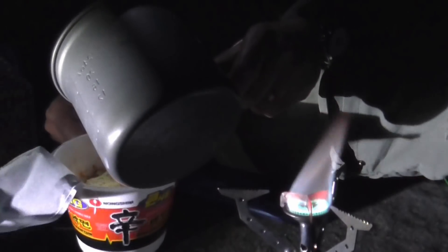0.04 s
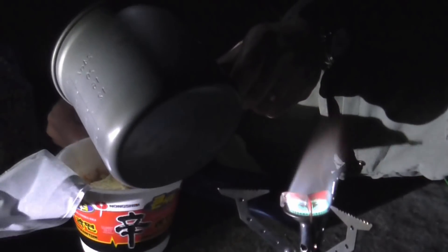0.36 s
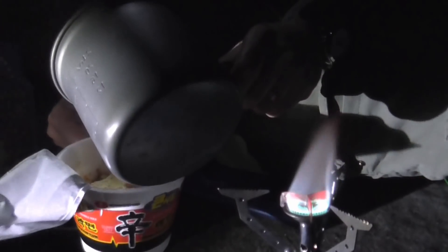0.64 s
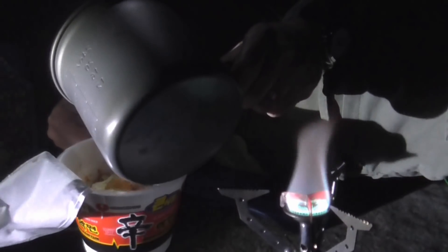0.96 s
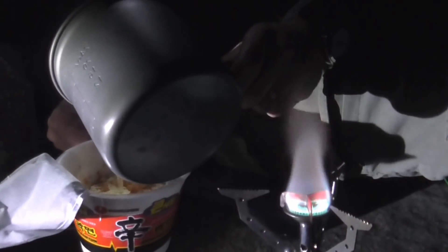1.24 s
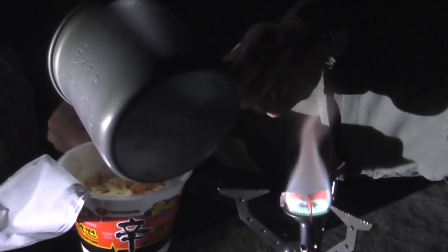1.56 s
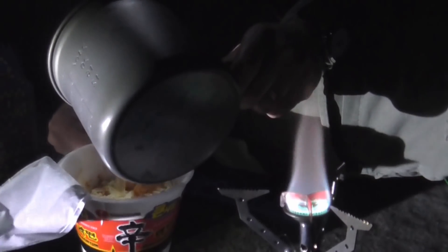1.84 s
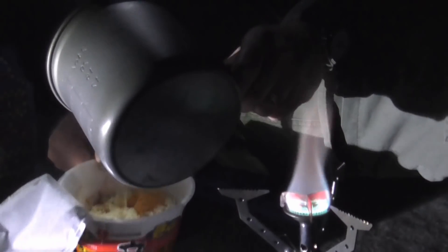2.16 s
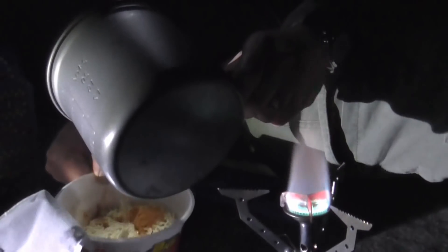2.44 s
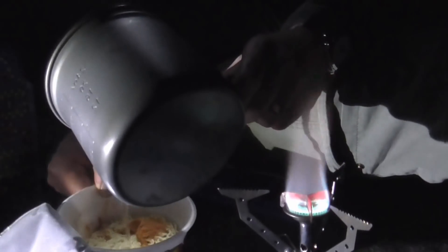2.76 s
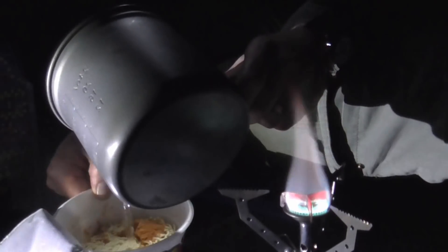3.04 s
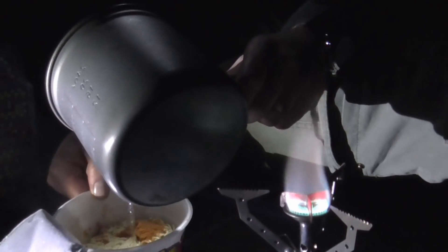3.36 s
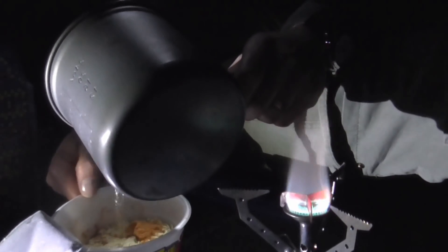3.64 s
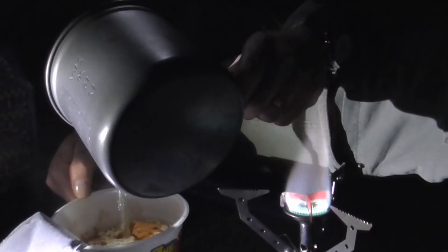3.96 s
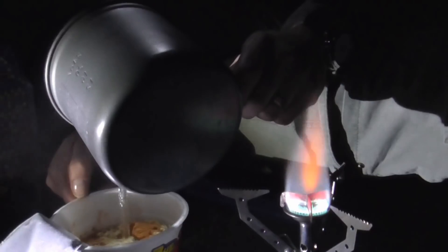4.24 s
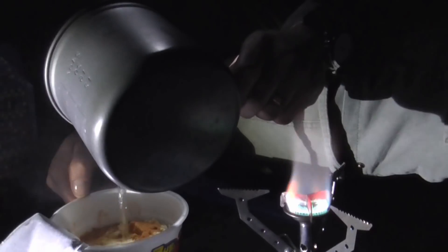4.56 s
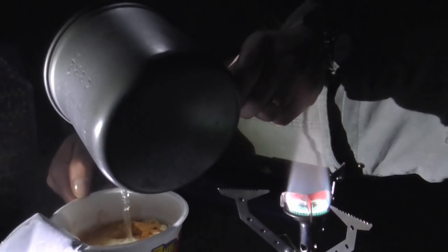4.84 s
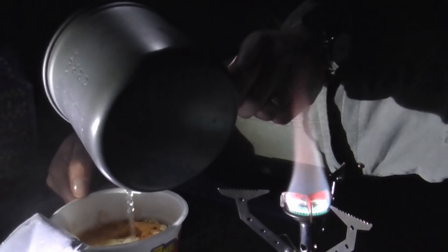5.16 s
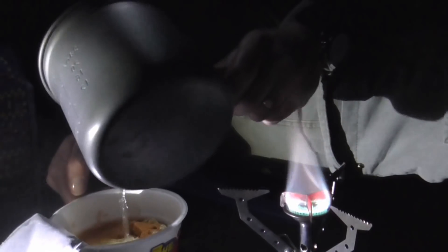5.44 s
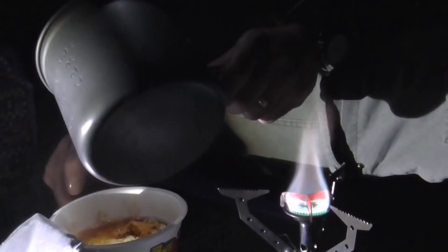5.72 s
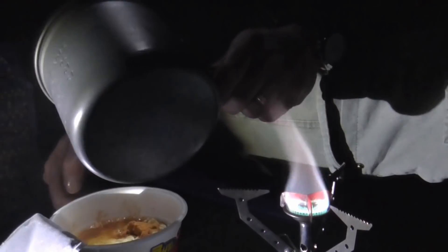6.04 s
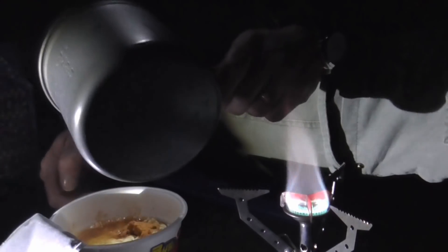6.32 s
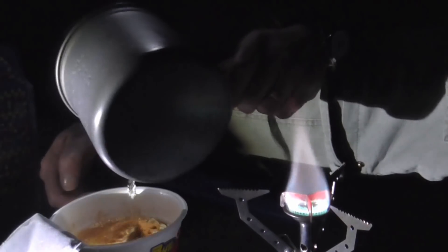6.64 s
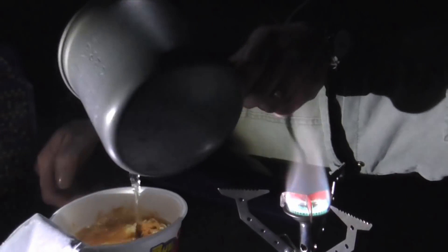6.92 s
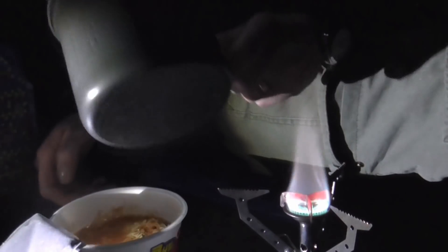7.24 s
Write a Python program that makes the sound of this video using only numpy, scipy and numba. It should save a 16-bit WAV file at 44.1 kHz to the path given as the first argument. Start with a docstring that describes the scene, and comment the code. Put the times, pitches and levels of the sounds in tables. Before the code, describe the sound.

Outdoors, close stereo microphones pick up the constant low roar and hiss of a gas burner, with no reverberation. Beneath it, water briefly trickles onto dry noodles. The noodle cup gives one sharp snap, then light knocks and rubs mix with a rustling sleeve. A thin stream patters into the cup for about three seconds, slowly growing, followed by small bubble pops and two short dribbles.

```python
"""Outdoors at night, two microphones close to a gas camping stove, with no room around it. The flame roars
low and steady and its jet hisses throughout. A sleeve rustles, hot water trickles from a metal mug into a
cup of dry noodles, and the cup's rim snaps once in the hand. Then comes the long pour: the thin stream
patters and spits while the cup knocks and rubs. Small bubbles burst more often as broth pools, and two
last dribbles follow near 7 s."""
import sys
import numpy as np
from scipy import signal
from scipy.fft import rfft, irfft
from scipy.io import wavfile
from scipy.ndimage import uniform_filter1d
from numba import njit

SR = 44100
rng = np.random.default_rng(int(sys.argv[2]) if len(sys.argv) > 2 else 0)


def master_out(mix):
    """Clip the mix to full scale and print it as 16-bit PCM to the path in sys.argv[1]."""
    frames = np.transpose(np.atleast_2d(mix))
    ceiling = np.clip(frames, -1, 1)
    pcm = np.round(ceiling * 32767).astype(np.int16)
    wavfile.write(sys.argv[1], SR, pcm)


N = 330000
TIME = np.arange(N) / SR
SHORT = TIME[:2048]  # time axis of one brief event
SHIFT_ATTACK_S, SHIFT_RELEASE_S = 0.011, 0.017

# modes of the cup's wall (frequency [Hz], level [dB], free decay t60 [s])
WALL = [(775, 3.5, 0.017), (1020, 0, 0.012), (1300, -5, 0.023), (1470, -2, 0.015), (1770, 3.5, 0.0069),
        (2080, -28, 0.0098)]


def stove(pan_db=-0.47):
    """The flame is a broad source a little to the right: part of its sound differs between the sides."""
    # stereo width of the stove (frequency [Hz], side minus mid [dB])
    width = [(30, 6), (60, -15), (110, -20.5), (250, -25), (420, -20.5), (700, -11), (2400, -7.5),
             (4400, -8), (6400, -42), (9000, -6.5), (15000, -3.5)]
    mid, side = burner(), colour(burner(), width)
    return stereo(mid, side, pan_db)


def burner(roar_db=-37.5, rush_db=-54.5, flutter_db=1.2):
    """The turbulent flame roars, gas flutters through the burner head and the jet hisses."""
    # spectrum of the flame (frequency [Hz], level [dB])
    roar_colour = [(25, -55), (50, -39), (62, -25.5), (100, -14.5), (140, -8.5), (230, -5), (310, 0.5),
                   (420, -2.5), (480, -6.5), (550, -15), (690, -16.5), (800, -35.5), (1100, -48),
                   (1800, -110)]
    # spectrum of the gas in the burner head (frequency [Hz], level [dB])
    rush_colour = [(450, -23), (750, -0.5), (1050, 3), (1350, 0.5), (1550, -6.5), (1900, -5), (2300, -16.5),
                   (2700, -20.5), (4000, -39)]
    roar = unit(colour(noise(), roar_colour)) * undb(roar_db + 0.31 * walk(7.3))
    rush = unit(colour(noise(), rush_colour)) * undb(rush_db + 0.56 * walk(9) + flutter_db * walk(120))
    return roar + rush + jet()


def jet():
    """The gas jet hisses broadly; the mug moving beside the burner retunes its resonances."""
    # spectrum of the broad hiss (frequency [Hz], level [dB])
    hiss_colour = [(1800, -10), (2750, -9), (3300, -1.5), (4000, 0), (4800, -0.5), (5300, 3), (7200, 2.5),
                   (9200, 0), (10400, -2.5), (12000, -5.5), (13800, -4), (15600, -6.5), (17000, -31)]
    # resonances of the hiss (base frequency [Hz], width [Hz], base gain [dB], following of the mug [0-1])
    modes = [(5350, 410, 5, 0.06), (5895, 430, 8, 0.05), (6290, 520, 10.5, 0.92), (8470, 760, 6.5, 0.77),
             (11220, 760, 2.5, 0)]
    # the hiss as the mug moves (time [s], level [dB], frequency ratio [1], resonance boost [dB])
    mug_path = [(0, -54, 0.99, 0.5), (1.5, -56, 0.979, 0), (2.5, -53.5, 1.02, -3), (3.2, -55, 1.07, -5),
                (4.6, -55, 1.035, -3.5), (5.55, -53.5, 1.01, -3), (5.95, -55.5, .94, -7),
                (6.6, -55.3, .96, -7), (7.1, -55, .985, 0.5)]
    hiss_db, ratio, boost_db = curves(mug_path)
    hiss, drive = colour(noise(), hiss_colour), colour(noise(), hiss_colour)
    for hz, width, db, follows in modes:
        hiss = hiss + undb(db + follows * boost_db) * ring(drive, hz * ratio ** follows, width)
    return unit(hiss) * undb(hiss_db + 0.28 * walk(10))


def stream(drops_per_s=300, spread_db=3.8, fizz_share=.4, fizz_db=-4, gain_db=1.5):
    """The stream breaks into drops that slap the noodles and trap tiny bubbles."""
    # spectrum of drops inside the cup (frequency [Hz], level [dB])
    drop_colour = [(500, -31), (1100, 4), (1600, 3.5), (2100, 9), (2700, -9), (3400, 4), (4300, -3.5),
                   (5200, 8), (6000, 6.5), (7200, 5.5), (9500, 3.5), (12000, -6.5), (15600, -20.5)]
    slaps, fizz, splash = np.zeros(N), np.zeros(N), noise()
    for when, size, pitch, kind in rng.random((int(drops_per_s * N / SR), 4)):
        s = when * N / SR
        gain = undb(spread_db * min(-np.log(1 - size), 3.2))  # many small drops, few large
        if kind < fizz_share:
            hz = 4200 * 2 ** (1.6 * pitch)
            add(fizz, s, gain * bubble(hz, t60_at_5khz=0.0036, glide=0.062))
        else:
            add(slaps, s, gain * fade(0.012) * (1 - fade(0.004)))
    water = unit(colour(slaps * splash, drop_colour)) + undb(fizz_db) * unit(fizz)
    return place(water * flow() * undb(gain_db), pan_db=1.5, side_db=-23.0)


def flow(attack_s=.026, release_s=.07, fill_db_per_s=1.64, soak_db=-73.5):
    """Strength of the patter: each pour starts quickly, swells as water pools and drips out."""
    # a trickle, the long pour, two dribbles (start [s], length [s], relative starting level [dB])
    pours = [(1.15, 0.64, -66.5), (2.33, 3.3, -63.5), (6.775, .17, -55.5), (7.107, .11, -59)]
    patter = np.zeros(N)
    for s, length, db in pours:
        swell_db = fill_db_per_s * np.clip(TIME - s, 0, length)
        patter += gesture(s, length, attack_s, release_s) * undb(db + swell_db)
    return np.hypot(patter, undb(soak_db))  # the noodles crackle faintly between pours


def ticks(t60=0.011, swell_t60=.009, gain_db=23, pivot_hz=6500):
    """Spitting water and the crackling cup give brief cracks; the sharper the contact, the brighter."""
    # single ticks (time [s], relative level [dB], brightness [dB per octave])
    events = [(0.2197, -41.5, -1), (2.7495, -47, 4), (2.828, -43.5, 8), (2.836, -43.5, 5),
              (3.141, -43.5, 8.5), (3.2098, -47.5, -3), (3.544, -44, -2), (3.717, -47.5, -4),
              (3.9247, -45, 6), (3.942, -44, 7), (3.9856, -43, 6), (4.0016, -46, -7), (4.0302, -40, -3.5),
              (4.043, -42.5, -4), (4.3037, -39.5, 5), (4.3985, -49, 6), (4.5558, -47.5, 1),
              (5.099, -41.5, -2.5), (5.1165, -40.5, -0.5), (5.131, -42, -1), (5.274, -41, -1.5),
              (5.5837, -48, 0), (5.605, -37.5, 0), (6.6018, -44.5, 1.5), (6.8622, -48.5, -4),
              (6.8973, -43, 0.5), (7.0196, -46.5, 6), (7.129, -44, 1.5)]
    # spectrum shared by all ticks (frequency [Hz], level [dB])
    tick_colour = [(400, -3), (1770, 2.5), (3320, 0), (6430, 6.5), (11900, -1), (17000, -8)]
    hz, base_db = np.transpose(tick_colour)
    octaves = np.log2(np.maximum(hz, hz[1]) / pivot_hz)  # the tilt levels off in the lows
    track = np.zeros(N)
    for s, db, brightness in events:
        tilted = np.column_stack([hz, base_db + brightness * octaves])
        add(track, s, undb(db + gain_db) * colour(crack(t60, swell_t60), tilted))
    return place(in_cup(track), pan_db=1.5, side_db=-13.5)


def in_cup(x):
    """The cup adds its short ring to a sound without changing its power."""
    # resonances of the cup (frequency [Hz], width [Hz], gain [dB])
    modes = [(2120, 610, -0.5), (3420, 1100, -1.5), (5150, 740, -3.5), (7030, 1400, -4.5)]
    ringing = sum(undb(db) * ring(x, hz, width) for hz, width, db in modes)
    return unit(x + ringing) * np.std(x)


def snap(at_s=1.9342, peak_db=-15.8, contact_t60=.006, crack_db=-18):
    """As the hand lowers the cup, its rim gives way in quick slips that ring heavily damped modes."""
    # modes of the rim (frequency [Hz], half width [Hz], level [dB])
    rim = [(1700, 190, 2), (1954, 100, -5), (3650, 700, -1.5), (5580, 380, 0.5), (6780, 420, 2),
           (7820, 370, 0), (8750, 350, -6), (9900, 540, -2.5), (11000, 500, -9), (14470, 1600, -4)]
    slips = crack(contact_t60)
    sound = undb(crack_db) * crack(t60=.012)
    for hz, half_width, db in rim:
        mode = ring(slips, hz, 2 * half_width)
        sound = sound + undb(db) * mode / np.linalg.norm(mode)
    track = np.zeros(N)
    add(track, at_s, undb(peak_db) * sound / np.abs(sound).max())
    return place(track, pan_db=0.5, side_db=-13)


def bubbles(gain_db=2.5, pooled_s=4.1, faint_count=14, faint_db=-48, low_hz=3010, octaves=1.96):
    """Single bubbles burst; once broth has pooled, fainter ones join in at random."""
    # the clearest bubbles (time [s], relative level [dB], starting pitch [Hz])
    clear = [(0.689, -45, 3940), (1.7, -44.5, 3540), (3.8948, -39, 2080), (4.1456, -46, 2140),
             (4.294, -37, 7840), (4.3704, -37, 6850), (4.7356, -43, 4570), (4.8614, -46, 2100),
             (5.6054, -24, 5240), (5.768, -41, 7840), (5.8582, -40, 7500), (5.994, -43, 4570),
             (6.3197, -46.5, 2110), (6.3948, -39, 8450), (6.4306, -41, 7840), (6.6499, -39, 8190),
             (6.906, -43, 3080), (6.9777, -37, 11810), (7.2438, -43, 2200), (7.2986, -41.5, 11810)]
    faint = [(pooled_s + when * (N / SR - pooled_s), faint_db, low_hz * 2 ** (octaves * pitch))
             for when, pitch in rng.random((faint_count, 2))]
    track = np.zeros(N)
    for s, db, hz in [*clear, *faint]:
        add(track, s, undb(db + gain_db) * bubble(hz, t60_at_5khz=0.0092, glide=0.039))
    return place(track, pan_db=1.0, side_db=-14)


def bubble(hz, t60_at_5khz, glide):
    """A bubble rings and rises in pitch; smaller ones ring higher and shorter."""
    decay = fade(t60_at_5khz * np.sqrt(5000 / hz))
    pitch = hz * (1 + glide * (1 - decay))
    return np.sin(2 * np.pi * np.cumsum(pitch) / SR) * decay


def taps(gain_db=-2, push_t60=0.0036):
    """Soft knocks push the wall of the cup for a moment and leave it ringing."""
    # dull taps on the cup (time [s], relative peak level [dB])
    knocks = [(.808, -35.5), (1.437, -35.5), (1.70, -35.5), (1.937, -29), (2.561, -27.5), (2.572, -25),
              (2.838, -30), (2.89, -35), (3.085, -32), (3.19, -36), (7.13, -36)]
    track = np.zeros(N)
    for s, db in knocks:
        wall = sum(undb(mode_db) * np.sin(2 * np.pi * (hz * SHORT + rng.random())) * fade(t60)
                   for hz, mode_db, t60 in WALL)
        knock = wall * (1 - fade(push_t60))
        add(track, s, undb(db + gain_db) * knock / np.abs(knock).max())
    return place(track, pan_db=2, side_db=-16)


def rub(slips_per_s=520, spread_db=3):
    """The cup sticks and slips in the hand; each slip rings its wall, damped by the fingers."""
    _, pressure = hand_shifts()
    slipping = rng.random(N) < slips_per_s / SR
    slips = slipping * np.sign(noise()) * undb(spread_db * noise())
    wall = sum(undb(db) * np.sin(2 * np.pi * hz * SHORT) * fade(t60 / 2) for hz, db, t60 in WALL)
    sound = signal.fftconvolve(slips, wall)[:N]
    return place(unit(sound) * pressure, pan_db=1.5, side_db=-16)


def sleeve(grain_db=3, rest_db=-63, settles_at_s=3.04, release_s=.15):
    """Cloth slides in many tiny slips: with each shift of the hand, and faintly until the arm settles."""
    # spectrum of the cloth (frequency [Hz], level [dB])
    cloth_colour = [(400, -10), (900, 3), (1900, 6), (2700, -2.5), (4000, -0.5), (7000, -3.5),
                    (11000, -4.5), (15600, -12)]
    moving, _ = hand_shifts()
    resting = undb(rest_db) * gesture(0, settles_at_s, SHIFT_ATTACK_S, release_s)
    slips = noise() * undb(grain_db * walk(400))
    rustle = unit(colour(slips, cloth_colour)) * np.hypot(moving, resting)
    return place(rustle, pan_db=1.5, side_db=-24)


def hand_shifts():
    """Strength of the sleeve's rustle and of the cup's rub; each shift of the hand drives both."""
    # shifts of the hand on the cup (start [s], length [s], sleeve level [dB], rub level [dB])
    shifts = [(0, .21, -53, -72), (2.742, 0.031, -49, -51), (2.826, .03, -46.5, -47),
              (2.878, 0.054, -60, -54), (2.933, .035, -56, -49.5), (3.03, .18, -65, -57),
              (3.464, .1, -72, -60)]
    return sum(np.outer(undb(levels_db), gesture(s, length, SHIFT_ATTACK_S, SHIFT_RELEASE_S))
               for s, length, *levels_db in shifts)


def breeze(db=-80, gust_db=4):
    """Faint puffs of night air rumble on each microphone separately."""
    # spectrum of the rumble (frequency [Hz], level [dB])
    rumble_colour = [(15, 2), (40, -8), (90, -14), (300, -60)]
    rumble = np.array([unit(colour(noise(), rumble_colour)) for _ in range(2)])
    return rumble * undb(db + gust_db * walk(8))


def place(x, pan_db, side_db):
    """A close source between two microphones; scatter from nearby things makes them differ."""
    scatter = rng.standard_normal(len(SHORT)) * fade(0.014)
    side = undb(side_db) * signal.fftconvolve(x, scatter / np.linalg.norm(scatter))[:N]
    return stereo(x, side, pan_db)


def stereo(mid, side, pan_db):
    """Mid and side to left and right; a positive pan leans left."""
    return np.array([(mid + side) * undb(pan_db / 2), (mid - side) * undb(-pan_db / 2)])


def crack(t60, swell_t60=0.0043):
    """A burst of noise that swells and dies in milliseconds, with unit energy."""
    burst = np.sign(rng.standard_normal(len(SHORT))) * fade(t60) * (1 - fade(swell_t60))
    return burst / np.linalg.norm(burst)


def gesture(start, length, attack, release):
    """Envelope that rises, holds and dies away once its length is over."""
    age = TIME - start
    return np.clip(age / attack, 0, 1) * np.exp(-np.maximum(age - length, 0) / release)


def colour(x, points):
    """Minimum-phase filter through (frequency [Hz], level [dB]) points."""
    hz, db = np.transpose(points)
    size = 8192
    grid = np.maximum(np.fft.rfftfreq(size, 1 / SR), 1)
    gain = undb(np.interp(np.log(grid), np.log(hz), db))
    cepstrum = irfft(np.log(gain))
    cepstrum[1:size // 2] *= 2
    cepstrum[size // 2 + 1:] = 0
    impulse = irfft(np.exp(rfft(cepstrum)))
    return signal.fftconvolve(x, impulse)[:len(x)]


def ring(x, hz, width):
    """One mode, steady or moving: two band-passes in series, each of this width in Hz."""
    centre = hz * np.ones(len(x))
    return resonance(resonance(x, centre, float(width)), centre, float(width))


@njit
def resonance(x, hz, width):
    """Band-pass with a moving centre and a gain of one."""
    y, band_state, low_state = np.empty(len(x)), 0., 0.
    for i in range(len(x)):
        g, damping = np.tan(np.pi * hz[i] / SR), width / hz[i]
        band = (band_state + g * (x[i] - low_state)) / (1 + g * (g + damping))
        band_state = 2 * band - band_state
        low_state += 2 * g * band
        y[i] = damping * band
    return y


def curves(table):
    """The later columns of a table, interpolated over the times in its first."""
    s, *columns = np.transpose(table)
    return [np.interp(TIME, s, c) for c in columns]


def noise():
    """White noise."""
    return rng.standard_normal(N)


def walk(rate):
    """Random drift with an rms of one and `rate` steps a second."""
    hold = int(SR / rate)
    steps = np.repeat(rng.standard_normal(N // hold + 1), hold)[:N]
    return unit(uniform_filter1d(steps, hold))


def fade(t60):
    """Exponential decay that falls 60 dB in t60 seconds."""
    return np.exp(-np.log(1000) * SHORT / t60)


def add(track, s, sound):
    """Mix a short sound into a track at time s."""
    start = int(np.clip(s * SR, 0, N - 1))
    track[start:start + len(sound)] += sound[:N - start]


def undb(db):
    """Decibels to gain."""
    return 10 ** (np.asarray(db) / 20)


def unit(x):
    """Scale to an rms of one."""
    return x / np.sqrt(np.mean(x ** 2))


def scene():
    """Stove, water, cup and sleeve, all close to the microphones in the open air."""
    return stove() + stream() + ticks() + snap() + bubbles() + taps() + rub() + sleeve() + breeze()


def record(dry):
    """The highest treble is cut off steeply."""
    top_hz = 15800
    return signal.sosfilt(signal.ellip(10, .2, 70, top_hz, fs=SR, output="sos"), dry)


dry = scene()
out = record(dry)
master_out(out)
```